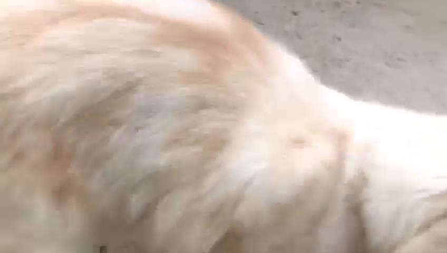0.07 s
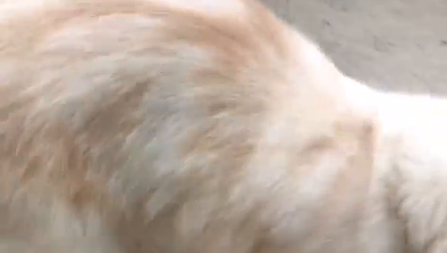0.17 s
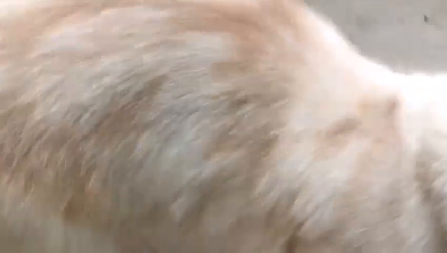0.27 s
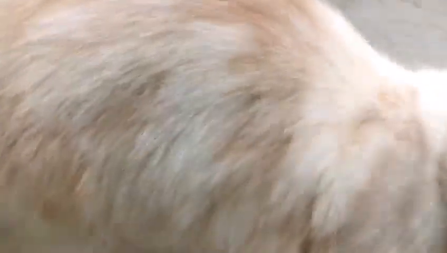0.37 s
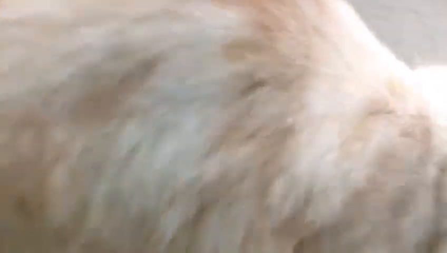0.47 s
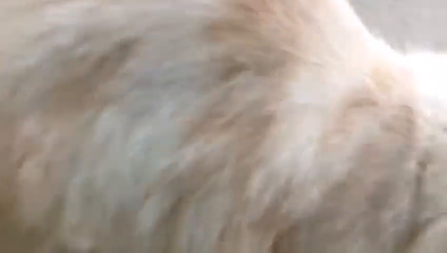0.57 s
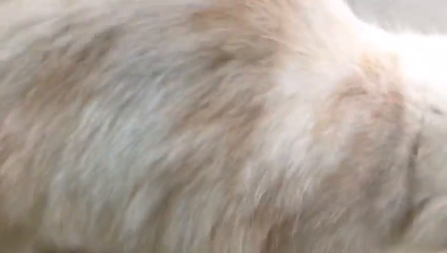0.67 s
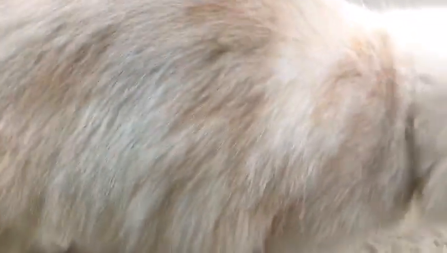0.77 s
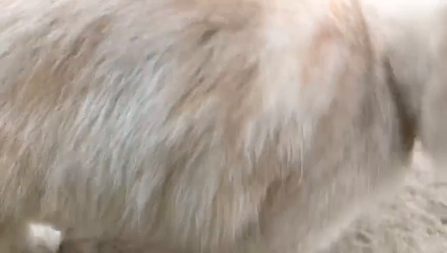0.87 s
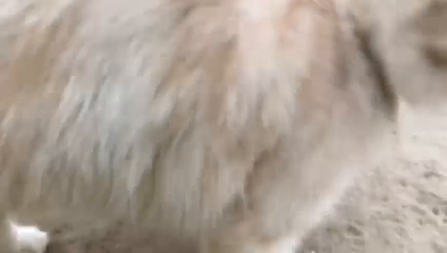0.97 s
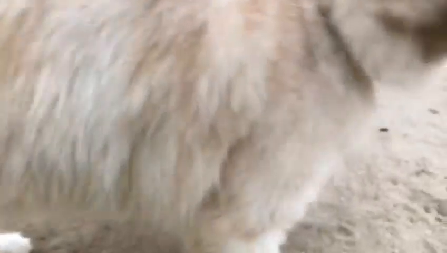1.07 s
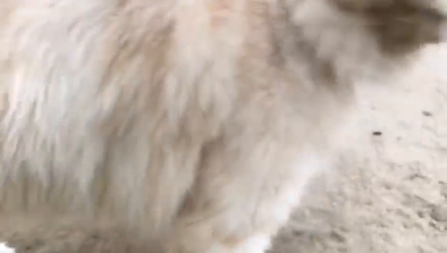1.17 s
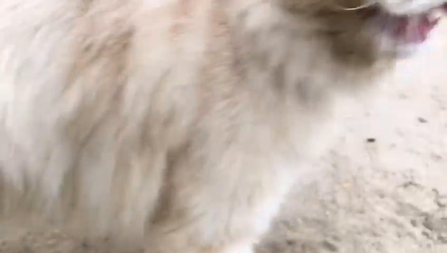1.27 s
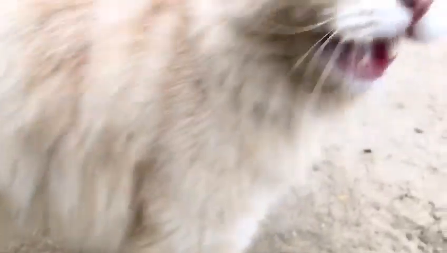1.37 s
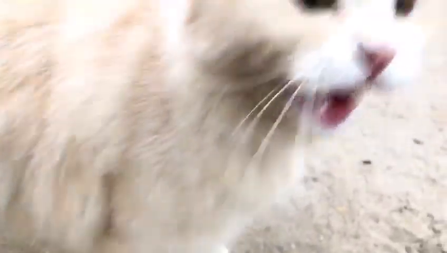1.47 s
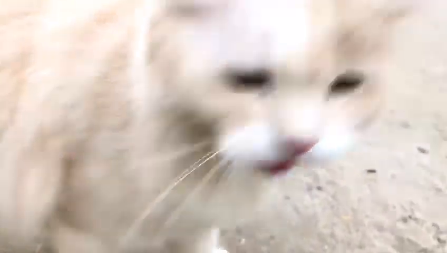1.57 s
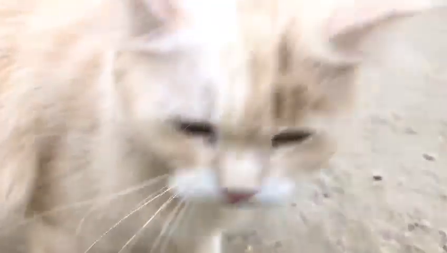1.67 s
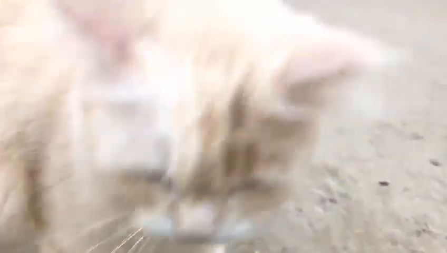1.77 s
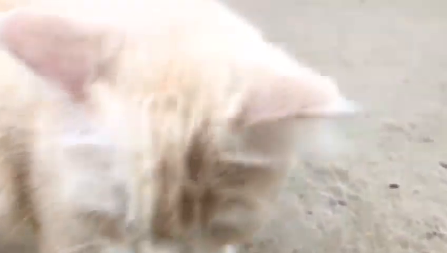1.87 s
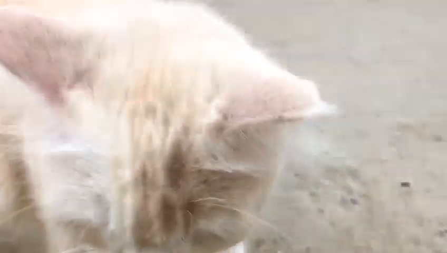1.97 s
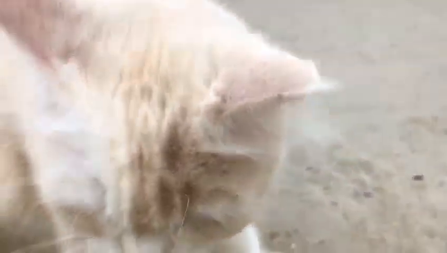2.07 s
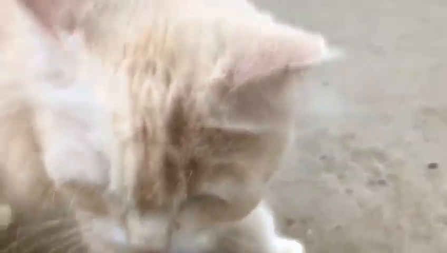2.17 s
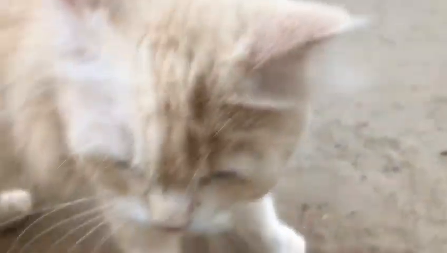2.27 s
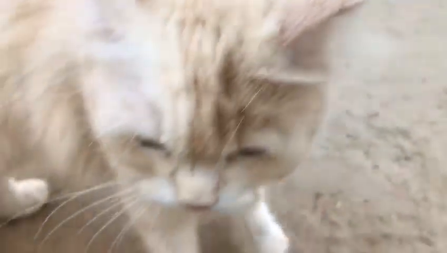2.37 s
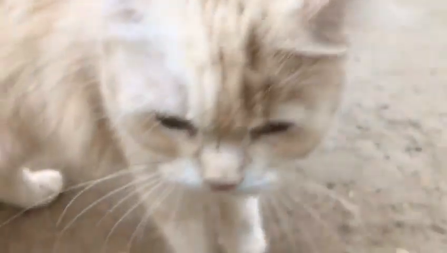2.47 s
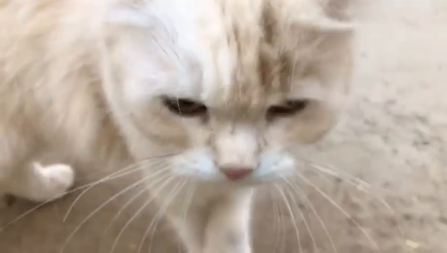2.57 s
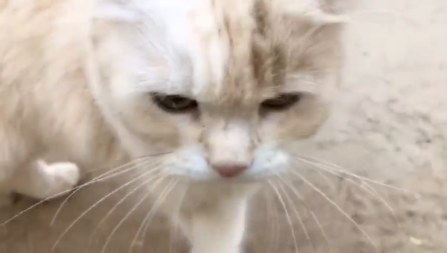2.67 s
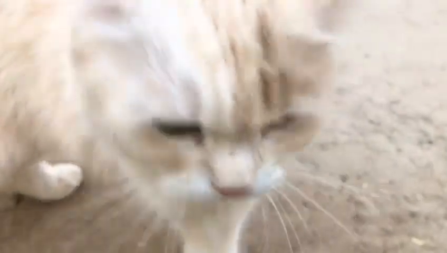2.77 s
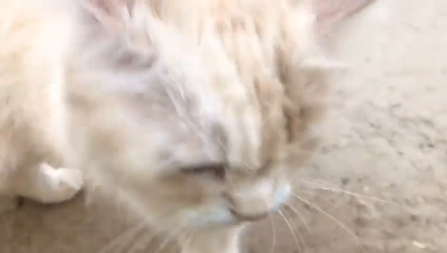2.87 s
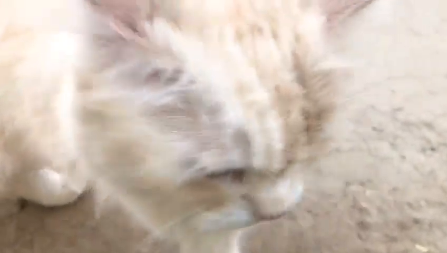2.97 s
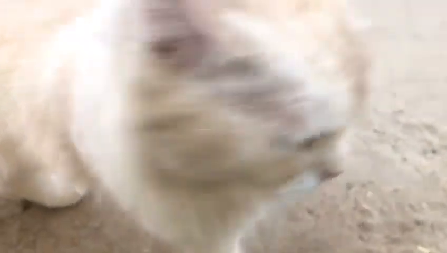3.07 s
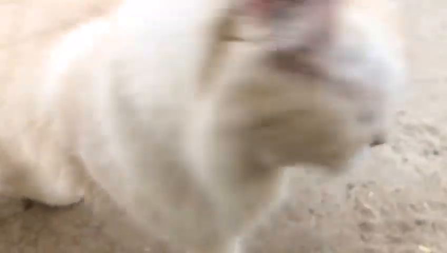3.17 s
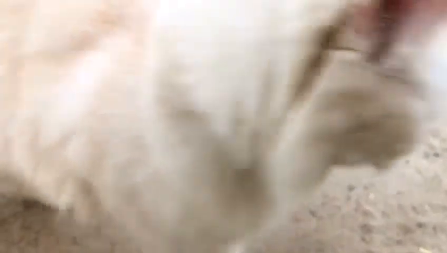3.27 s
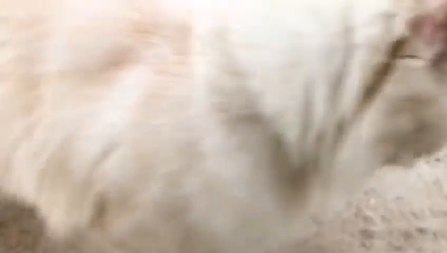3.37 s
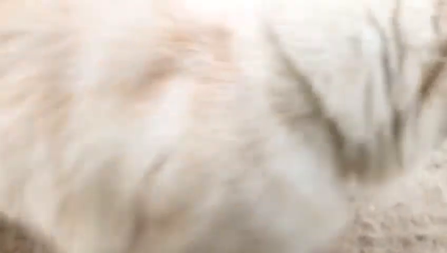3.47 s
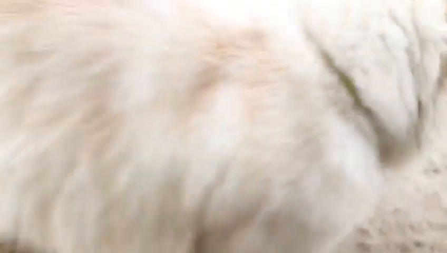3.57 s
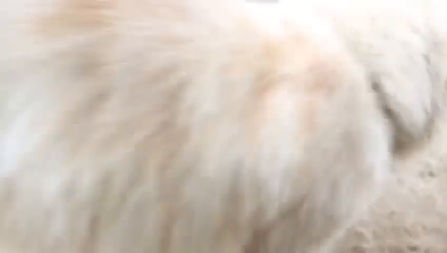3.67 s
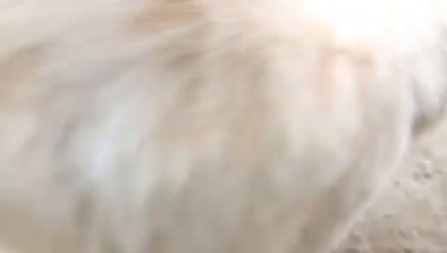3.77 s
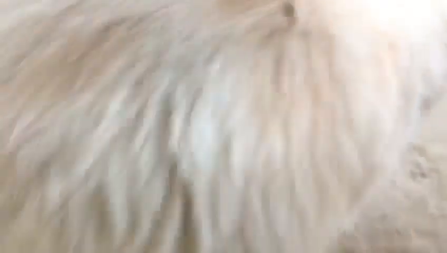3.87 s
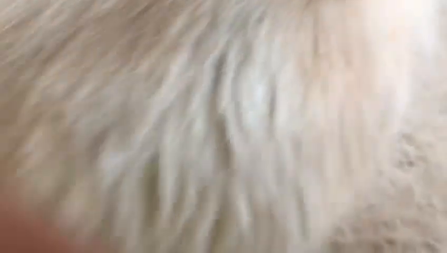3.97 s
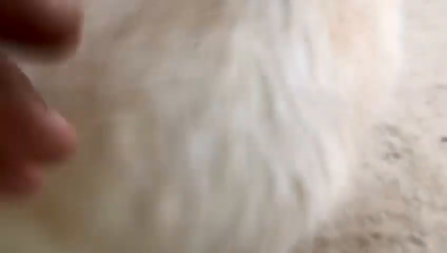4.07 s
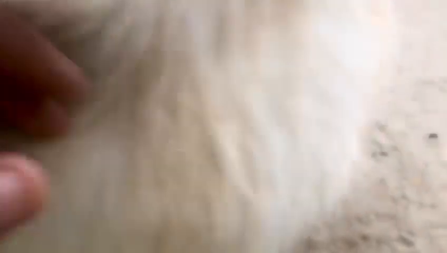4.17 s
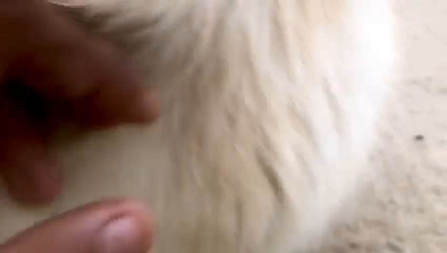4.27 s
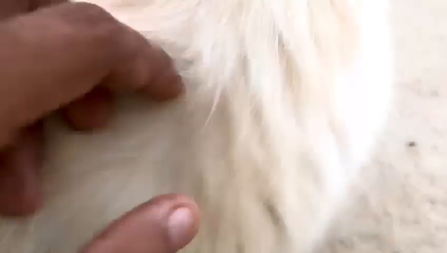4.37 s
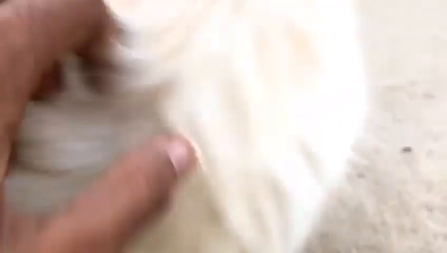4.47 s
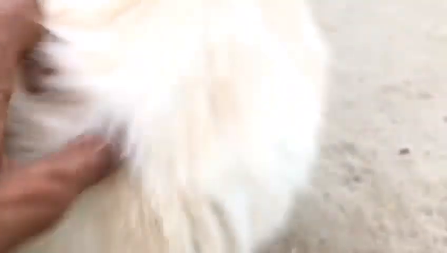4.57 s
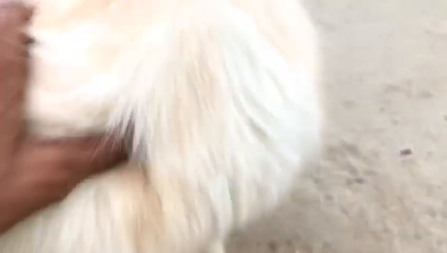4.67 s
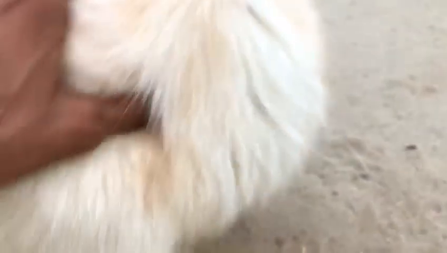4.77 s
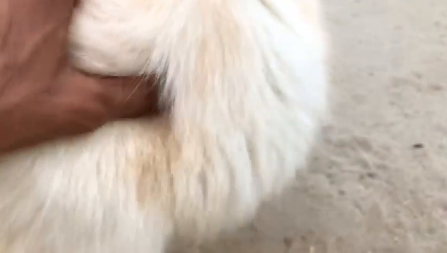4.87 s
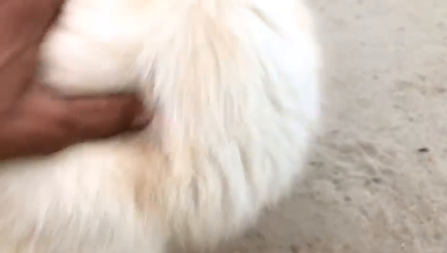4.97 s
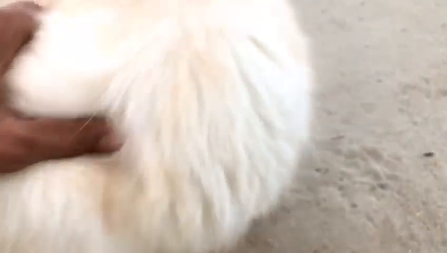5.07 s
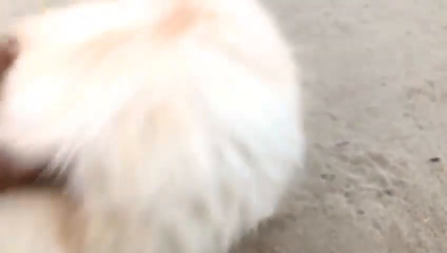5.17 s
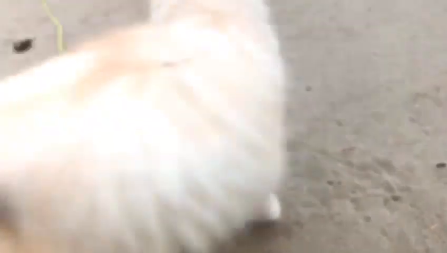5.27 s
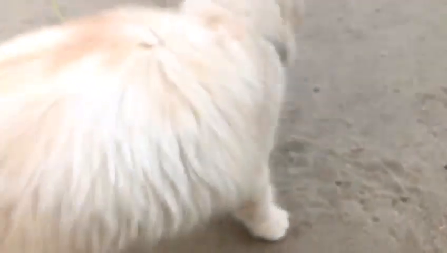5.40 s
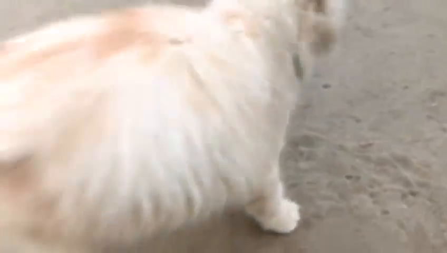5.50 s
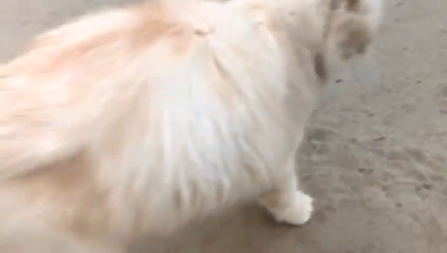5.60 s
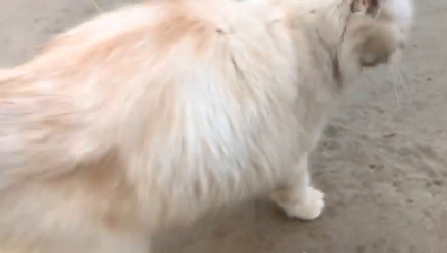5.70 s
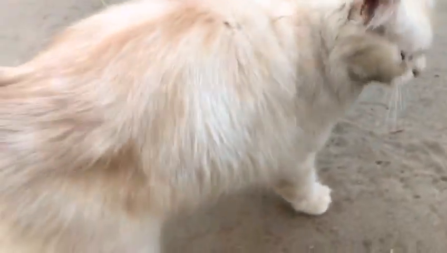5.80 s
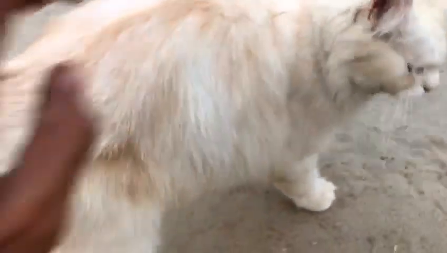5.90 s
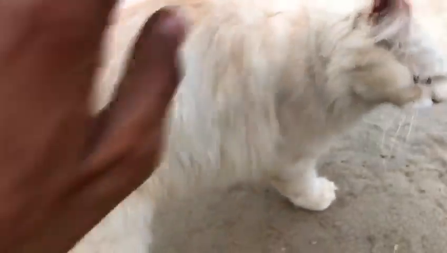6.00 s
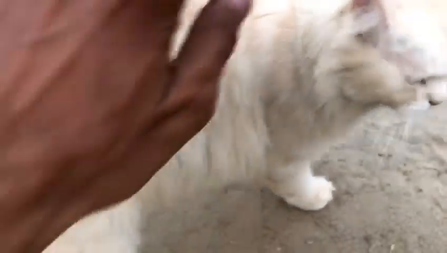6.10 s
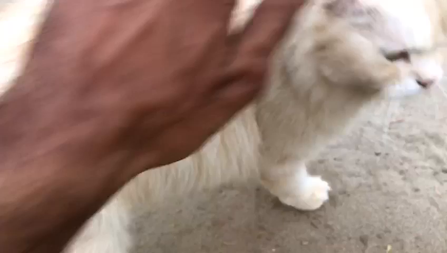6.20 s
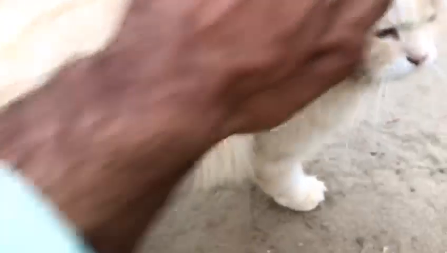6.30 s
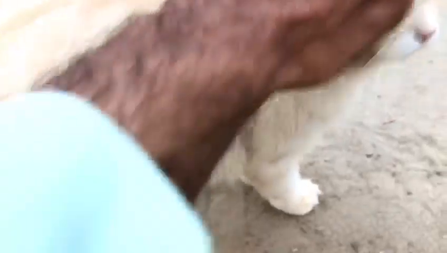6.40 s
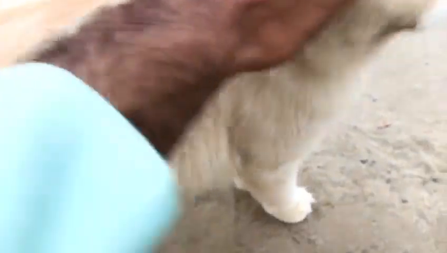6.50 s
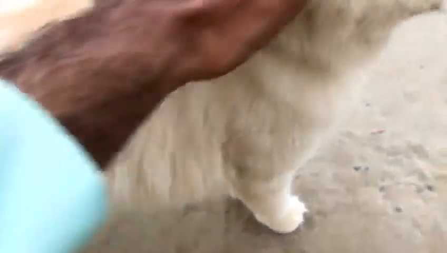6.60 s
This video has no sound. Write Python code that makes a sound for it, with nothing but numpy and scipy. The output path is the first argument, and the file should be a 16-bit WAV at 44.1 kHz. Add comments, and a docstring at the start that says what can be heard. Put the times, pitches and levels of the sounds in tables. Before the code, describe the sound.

Close handheld pickup of a cat on sandy ground outdoors: small gritty ticks and a light rub, then one loud, clear meow that opens, holds and closes roughly. Distant birds call over faint traffic and air while the holding hand shifts dully. A tight cluster of clicks and a scrape breaks the calm, then fingers brush fur and the cat answers with a brief, weak, raspy meow.

```python
"""Low traffic rumble, hissing air, a pulsing insect and far birds (noise bands, gliding tones) fill a yard.
A motor hum, a sine, soon fades; ticks of grit and a rub of friction noise precede the first call.
A near cat gives a loud arching meow: fold harmonics and breath ring a gliding mouth, rough when slack.
A finger then knocks on a case (click, scrape, decaying modes), and a hand strokes the cat's fur.
A faint hoarse meow ends it; soft low shuffles of the hand that holds the case come and go throughout."""
import sys
import numpy as np
from scipy import signal
from scipy.fft import rfft, irfft, next_fast_len
from scipy.io import wavfile
from scipy.ndimage import uniform_filter1d, map_coordinates

SR = 44100
rng = np.random.default_rng(int(sys.argv[2]) if len(sys.argv) > 2 else 0)


def digitize_waveform(pressure):
    """Quantize a signal to 16-bit integers and store it at the path in sys.argv[1].

    Rows of a 2-D input are taken as channels; values are limited to [-1, 1].
    """
    field = np.atleast_2d(pressure).T
    bounded = np.clip(field, -1, 1)
    quanta = np.round(bounded * 32767).astype(np.int16)
    wavfile.write(sys.argv[1], SR, quanta)


N = 292824
TIME = np.arange(N) / SR
DRIFT_DB, DRIFT_PER_S = .8, 1.7  # size and random knots a second of the slow wander of rumble and air


def amp(db):
    """Logarithmic level: decibels to an amplitude ratio."""
    return 10 ** (np.asarray(db) / 20)


def unit(x):
    """Root mean square: scale a signal to rms 1."""
    return x / np.sqrt(np.mean(x ** 2) + 1e-20)


def along(points, hz):
    """Logarithmic frequency scale: interpolate (frequency [Hz], value) points along it."""
    f, v = np.transpose(points)
    return np.interp(np.log(hz + 1), np.log(f + 1), v)


def curve(rows, t, size=130):
    """Piecewise-linear control: (time [s], value) rows at times t, corners rounded by a moving mean."""
    return uniform_filter1d(np.interp(t, *np.transpose(rows)), size)


def wobble(rate, t):
    """Band-limited fluctuation: a smooth curve through random knots, rate of them a second."""
    at = (t - t[0]) * rate
    knots = rng.standard_normal(int(at[-1]) + 4)
    return map_coordinates(knots, [at + 1])


def filtered(x, response):
    """Linear filtering: multiply the spectrum of x by a response of frequency."""
    m = next_fast_len(len(x) + 8192)
    hz = np.fft.rfftfreq(m, 1 / SR)
    return irfft(rfft(x, m) * response(hz), m)[:len(x)]


def noise(spectrum, size):
    """Spectral shaping: white noise coloured by (frequency [Hz], level [dB]) points, rms 1."""
    white = rng.standard_normal(size)
    return unit(filtered(white, lambda hz: amp(along(spectrum, hz))))


def throat(spectrum, hz, size=2048):
    """Minimum phase: a folded cepstrum gives the log gain and phase of a causal resonator."""
    grid = np.fft.rfftfreq(size, 1 / SR)
    cepstrum = irfft(np.log(amp(along(spectrum, grid))))
    # keep the causal half only
    cepstrum[1:size // 2] *= 2
    cepstrum[size // 2 + 1:] = 0
    return np.interp(hz, grid, rfft(cepstrum))


def add(track, s, sound):
    """Superposition: mix a sound into the track at s seconds."""
    part = track[round(s * SR):][:len(sound)]
    part += sound[:len(part)]


def yard(x, wet_db, t60=0.52):
    """Reverberation: the walls around answer with an exponentially decaying noise tail."""
    t = TIME[:SR // 2]
    tail = noise([(300, -14), (3000, -10), (10000, -26)], len(t)) * amp(-60 * t / t60)
    return x + amp(wet_db) * signal.fftconvolve(x, tail / np.linalg.norm(tail))[:N]


def traffic(rumble_db=-55):
    """Broadband source: low noise whose level drifts slowly."""
    # rumble colour: (frequency [Hz], level [dB])
    rumble_colour = [(20, -53), (35, -13), (48, -2.5), (65, 3), (97, -5), (130, -6.5), (184, -8),
                     (278, -15), (313, -11.5), (358, -17), (700, -31), (1200, -84)]
    return amp(rumble_db + DRIFT_DB * wobble(DRIFT_PER_S, TIME)) * noise(rumble_colour, N)


def open_air(air_db=-66.5):
    """Broadband source: soft hiss with a slow and a quicker random drift of level."""
    # hiss colour: (frequency [Hz], level [dB])
    hiss_colour = [(250, -17), (600, 0.5), (1100, -1), (1900, 0), (2300, -3.5), (3200, -7), (4200, -9),
                   (6200, -11.5), (7800, -15.5), (10000, -16), (12000, -19)]
    drift_db = DRIFT_DB * wobble(DRIFT_PER_S, TIME) + wobble(4.4, TIME)
    return amp(air_db + drift_db) * noise(hiss_colour, N)


def motor(hz=72, db=-48.5, hold_s=0.39, fade_db_per_s=34):
    """Exponential decay: a motor's pure hum holds, then dies away, wavering in level."""
    level_db = db - fade_db_per_s * np.maximum(TIME - hold_s, 0)
    return amp(level_db + wobble(17, TIME)) * unit(np.sin(2 * np.pi * hz * TIME))


def insect(db=-74, depth_db=3.5, pulse_hz=10.1):
    """Amplitude modulation: a high narrow buzz swells ten times a second."""
    # buzz colour: (frequency [Hz], level [dB])
    buzz_colour = [(5800, -64), (6450, -8), (6750, 0.5), (7150, 3.5), (7450, -10), (8000, -34)]
    beat = np.cos(2 * np.pi * pulse_hz * (TIME - .022)) + .15 * wobble(5, TIME)
    return amp(db) * unit(amp(depth_db * beat) * noise(buzz_colour, N))


def chirps(count=12):
    """Frequency glide: very far small birds twitter at random pitches and moments, mostly falling."""
    out = np.zeros(N)
    for when, high, long, slide, loud in rng.random((count, 5)):
        t = TIME[:int((.03 + .07 * long) * SR)]
        glide = 0.61 * (slide - .7) * t / t[-1]
        hz = 2400 * 2.7 ** high * (1 + glide + 0.0073 * wobble(234, t))
        tone = np.hanning(len(t)) * np.sin(2 * np.pi * np.cumsum(hz) / SR)
        add(out, when * N / SR, amp(-84 + 5 * loud) * unit(tone))
    return out


def birds(top_share=0.29, sag_per_s2=10.47):
    """Frequency modulation: far calls share a parabolic pitch arch; random modulation makes some hoarse."""
    # calls: (time [s], length [s], top pitch [Hz], level [dB], hoarseness [Hz])
    calls = [(1.084, 0.19, 1394, -62, 138), (1.446, 0.19, 1496, -64, 50), (1.594, 0.15, 1330, -63, 15.2),
             (2.861, .23, 1770, -65, 58), (3.249, 0.18, 1767, -63.5, 39), (3.595, .22, 1483, -69, 170),
             (3.597, 0.059, 3040, -73, 8.3), (3.982, 0.13, 1303, -62.5, 23), (4.391, .1, 3030, -74, 15),
             (4.85, 0.11, 3095, -77, 20)]
    out = np.zeros(N)
    for s, length, top_hz, db, hoarse_hz in calls:
        t = TIME[:int(length * SR)]
        # the pitch tops out at top_share of the length
        arch = 1 - sag_per_s2 * (t - top_share * length) ** 2
        hz = top_hz * arch + hoarse_hz * wobble(398, t)
        tone = np.sin(np.pi * t / length) * np.sin(2 * np.pi * np.cumsum(hz) / SR)
        add(out, s, amp(db) * unit(tone))
    return out


def shuffles():
    """Friction noise: dull low swells as the hand that holds the case shifts its grip."""
    # swells: (time [s], length [s], centre pitch [Hz], peak level [dB])
    swells = [(1.14, 0.14, 217, -57.5), (2.253, 0.064, 162, -55.5), (2.9, 0.73, 162, -58.5),
              (4.366, 0.091, 437, -64)]
    out = np.zeros(N)
    for s, length, hz, db in swells:
        swell = np.exp(-((TIME - s) / length) ** 2)
        out += amp(db) * swell * noise([(hz / 4, -36), (hz, 0), (hz * 8, -90)], N)
    return out


def strokes(grain_db=2.5):
    """Friction noise: grainy swells of skin and fur; the light strokes over fur are brightest."""
    # strokes: (time [s], length [s], peak level [dB], treble tilt [dB per octave])
    rubs = [(0.699, 0.07, -61.5, -2), (3.888, 0.0083, -52.5, 0.5), (3.938, 0.023, -52.5, 0.5),
            (4.548, 0.077, -63, 8), (4.661, 0.033, -57.5, 6.5)]
    # friction colour before the tilt: (frequency [Hz], level [dB])
    fur = [(150, -13), (500, -1.5), (1500, -1), (3500, -5), (7000, -14), (12000, -19.5)]
    out = np.zeros(N)
    for s, length, db, tilt_db in rubs:
        t = np.arange(-2 * length, 2 * length, 1 / SR)
        colour = [(hz, level + tilt_db * np.log2(hz)) for hz, level in fur]
        rub = unit(noise(colour, len(t)) * amp(grain_db * wobble(700, t)))
        add(out, s - 2 * length, amp(db) * np.exp(-(t / length) ** 2) * rub)
    return out


def taps(snap_t60=0.007, click_db=10.0):
    """Modal excitation: each finger contact clicks, scrapes for an instant and briefly rings the case."""
    # contacts: (time [s], knock gain [dB], snap gain [dB], snap tilt [dB per octave])
    contacts = [(3.8905, -44, -49, 0), (3.8967, -29, -32.5, 2), (3.9080, -25.5, -26, -3.5),
                (3.9234, -37, -38, -1), (3.9477, -43, -40, 3)]
    # modes of the case: (frequency [Hz], level [dB], t60 [s])
    modes = [(74.5, -16.5, 0.085), (287, -15.5, 0.023), (590, -6, 0.018), (1000, -4, 0.011),
             (1560, -11, 0.0075), (2880, -2.5, 0.0034)]
    # snap colour before the tilt: (frequency [Hz], level [dB])
    snap_colour = [(300, 8), (1200, 1.5), (3600, -0.5), (5500, -4), (8000, -19), (12000, -20)]
    out, t = np.zeros(N), TIME[:SR // 10]
    grid = np.fft.rfftfreq(len(t), 1 / SR)
    # neighbouring modes start in opposite phase
    ring = sum((-1) ** i * amp(db - 60 * t / t60) * np.sin(2 * np.pi * hz * t)
               for i, (hz, db, t60) in enumerate(modes))
    for s, knock_db, snap_db, tilt_db in contacts:
        colour = [(hz, db + tilt_db * np.log2(hz)) for hz, db in snap_colour]
        click = irfft(np.exp(throat(colour, grid)))
        click *= amp(click_db) / np.linalg.norm(click)
        scrape = amp(-60 * t / snap_t60) * noise(colour, len(t)) / 2
        add(out, s, amp(knock_db) * ring + amp(snap_db) * (click + scrape))
    return out


def grit(rise_s=0.0013, t60=0.054):
    """Band-limited transients: short narrow ticks of sand and of the cat's lips."""
    # ticks: (time [s], level before the rise and decay [dB], pitch [Hz])
    ticks = [(.069, -60, 3680), (.149, -52, 1450), (.150, -60, 3900), (1.773, -44, 1300),
             (1.778, -53, 4670), (5.718, -53, 6300)]
    out, t = np.zeros(N), TIME[:SR // 10]
    for s, db, hz in ticks:
        envelope = amp(db - 60 * t / t60) * (1 - np.exp(-t / rise_s))
        add(out, s, envelope * noise([(hz / 2, -26), (hz, 0), (hz * 2, -40)], len(t)))
    return out


def slackness(db, slack_db, loosening_db=1.7, settle_s=.014):
    """Loss of tension: the folds roughen as the level falls about slack_db below its peak."""
    taut, rise = .022, .578  # roughness of taut folds; slack folds add rise / 1.5
    t = TIME[:len(db)]
    # the folds follow the effort late, so a call starts rough and stays clean into its fall
    below_db = db.max() - np.interp(t - settle_s, t, db)
    return taut + rise / (1.5 + np.exp((slack_db - below_db) / loosening_db))


def meow(pitch_rows, level_rows, mouth_rows, shapes, slack_db, rasp, sizzle_db,
         jitter=.06, shimmer_db=3, count=30, size=64):
    """Source and filter: vocal fold pulses ring a mouth gliding through its shapes; slack folds rattle."""
    # air through the teeth: (frequency [Hz], level [dB])
    teeth = [(200, -51), (3500, -47), (4300, -13), (5100, -10), (5800, 3), (7100, -12), (8000, -11),
             (10000, -21), (12000, -30)]
    first, last = int(level_rows[0][0] * SR), int(level_rows[-1][0] * SR)
    t = TIME[first:last]
    pitch, db, mouth = (curve(rows, t) for rows in (pitch_rows, level_rows, mouth_rows))
    rough = slackness(db, slack_db)
    doubling = .9 * rough
    # crossfade between neighbouring mouth shapes
    mouth = np.clip(mouth, 0, len(shapes) - 1)
    shares = [np.clip(1 - abs(mouth - i), 0, 1) for i in range(len(shapes))]
    # even taut folds waver a little; slackness adds jitter
    waver = .0018 * wobble(45, t) + jitter * rough * wobble(350, t)
    phase = 2 * np.pi * np.cumsum(pitch * (1 + waver)) / SR
    # whole multiples of the pitch; the halves between them sound when every other pulse is weak
    k = np.arange(2, 2 * count)[:, None] / 2
    # the mouth gives each multiple a gain and a phase lag, found every size samples
    colour = sum(share[::size] * throat(shape, k * pitch[::size])
                 for share, shape in zip(shares, shapes))
    strength = np.where(k % 1 == 0, 1, doubling[::size]) * np.exp(colour.real)
    strength /= np.sqrt((strength ** 2).sum(0) / 2)

    def fine(v):
        """Linear interpolation: bring a coarse control to every sample."""
        return np.interp(t, t[::size], v)

    voice = sum(fine(gain) * np.sin(multiple * phase + fine(lag))
                for multiple, gain, lag in zip(k, strength, colour.imag))
    # turbulence puffs through the folds once a cycle
    puffs = (1 + 0.49 * np.cos(phase)) * (1 + doubling * np.cos(phase / 2 - 1))
    air = unit(sum(share * noise(shape, len(t)) for share, shape in zip(shares, shapes)) * puffs)
    sizzle = amp(sizzle_db + 2 * wobble(30, t)) * unit(noise(teeth, len(t)) * puffs)
    # rougher folds trade voice for breath at constant power
    breath = np.clip(rasp * rough, 0, 1)
    mix = np.sqrt(1 - breath ** 2) * voice + breath * air + sizzle
    call = mix * amp(db + shimmer_db * rough * wobble(250, t))
    return np.pad(call * signal.windows.tukey(len(t), .08), (first, N - last))


def faint_meow():
    """Low fold tension: a faint, lower arch that turns hoarse."""
    # pitch arch: (time [s], pitch [Hz])
    pitch = [(5.38, 412), (5.508, 487), (5.548, 499), (5.608, 481.6), (5.636, 443.6), (5.68, 372)]
    # effort: (time [s], level [dB])
    level = [(5.37, -64), (5.392, -63), (5.508, -53), (5.544, -44.5), (5.712, -59.5), (5.718, -57),
             (5.78, -70)]
    # mouth glide: (time [s], shape index [0 murmur, 1 ah, 2 rasp])
    mouth = [(5.495, 0.14), (5.535, 1.22), (5.59, 0.91), (5.635, 1.9)]
    # throat and mouth colour of each shape: (frequency [Hz], level [dB])
    murmur = [(250, -25), (450, 8.5), (900, -31), (1700, 2), (2300, -25), (4000, -31), (8000, -40),
              (12000, -25)]
    small_ah = [(250, -30), (500, -9.5), (1000, -5.5), (1500, -8.5), (2000, -15), (2480, 2.5), (2980, -2.5),
                (3470, -25), (3970, 0), (4500, -12), (5000, -26), (6300, -13), (8000, -45), (12000, -54)]
    hoarse = [(250, -23), (400, 10), (750, -22), (1150, 6.5), (1800, -6), (2400, -3.5), (2950, 10),
              (3600, -40), (4400, 0), (5200, -20), (6700, -4), (8200, -32), (12000, -36)]
    return meow(pitch, level, mouth, [murmur, small_ah, hoarse], slack_db=6.3, rasp=1.2, sizzle_db=-24)


def loud_meow():
    """Moving formants: a loud arch of pitch while the mouth opens, holds and closes."""
    # pitch arch: (time [s], pitch [Hz])
    pitch = [(1.26, 450), (1.276, 444), (1.312, 490), (1.4, 539.8), (1.5, 558), (1.62, 553.3),
             (1.63, 540.5), (1.7, 537.5), (1.722, 488), (1.73, 499.5), (1.746, 424.7), (1.766, 383.6),
             (1.77, 378.5)]
    # effort: (time [s], level [dB])
    level = [(1.2, -56), (1.29, -34.5), (1.352, -33.5), (1.436, -28), (1.568, -28.5), (1.68, -33),
             (1.78, -50), (1.8, -51)]
    # mouth glide: (time [s], shape index [0 nasal, 1 mee, 2 ah, 3 ow, 4 shut])
    mouth = [(1.225, 0.7), (1.275, .1), (1.305, 1.56), (1.36, 1.74), (1.6, 2.24), (1.68, 3.16),
             (1.745, 3.87)]
    # throat and mouth colour of each shape: (frequency [Hz], level [dB])
    nasal = [(250, -11), (450, -19.5), (900, -10), (1350, -27), (1800, -1.5), (2020, -4), (2280, 1),
             (2600, -7.5), (3150, 1), (3600, -24), (4100, -12), (4900, -21), (5450, -14), (7100, -26),
             (8200, -58)]
    mee = [(250, -11), (480, -13), (950, -1.5), (1450, -11.5), (1950, -21), (2400, 9), (2950, -16),
           (3450, -12), (4100, -7), (4900, -19), (5800, -14), (6400, -33), (7400, -27), (8500, -72),
           (12000, -39)]
    ah = [(250, -25), (550, -19), (1100, -14), (1660, -18), (2220, -7), (2770, -0.5), (3330, -10.5),
          (3880, -13), (4430, -9.5), (5000, -18.5), (6900, -12.5), (8200, -32), (9500, -36), (12000, -48)]
    ow = [(250, -19.5), (540, -9.5), (1080, -7.5), (1620, -12), (2150, 0), (2700, -3), (3230, -3),
          (3760, -19), (4320, -8), (4900, -30), (6600, -8.5), (8100, -36), (9600, -26), (12000, -71)]
    shut = [(200, -3), (400, 7.5), (800, -2), (1100, 12.5), (1600, -4.5), (3000, 1.5), (3800, -39),
            (4700, -13), (6300, -15.5), (8000, -20), (12000, -35)]
    return meow(pitch, level, mouth, [nasal, mee, ah, ow, shut], slack_db=12.5, rasp=.85, sizzle_db=-28.5)


def scene():
    """Direct-to-reverberant ratio: far birds get more of the walls' answer than the near cat."""
    background = traffic() + open_air() + motor() + insect()
    far = yard(birds() + chirps(), wet_db=-10.5)
    cat = yard(loud_meow() + faint_meow() + grit(), wet_db=-29)
    hand = taps() + strokes() + shuffles()
    return (background + far + hand + cat)[None]


def record(dry, top_hz=11950):
    """Band limitation: a very steep low-pass removes what lies above top_hz."""
    return np.array([filtered(x, lambda hz: 1 / (1 + (hz / top_hz) ** 120)) for x in dry])


dry = scene()
out = record(dry)
digitize_waveform(out)
```